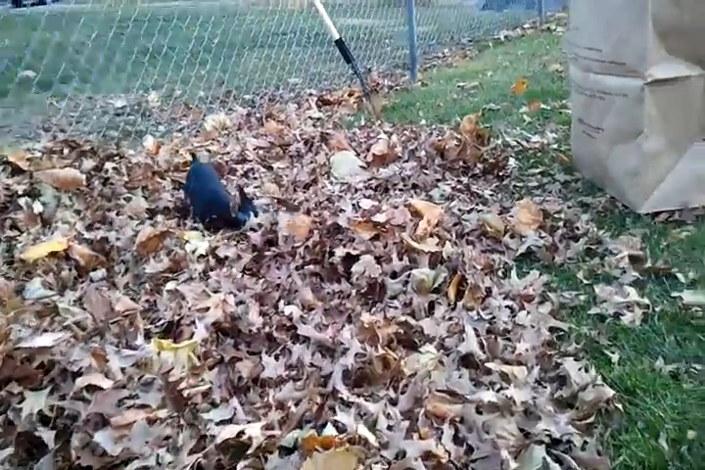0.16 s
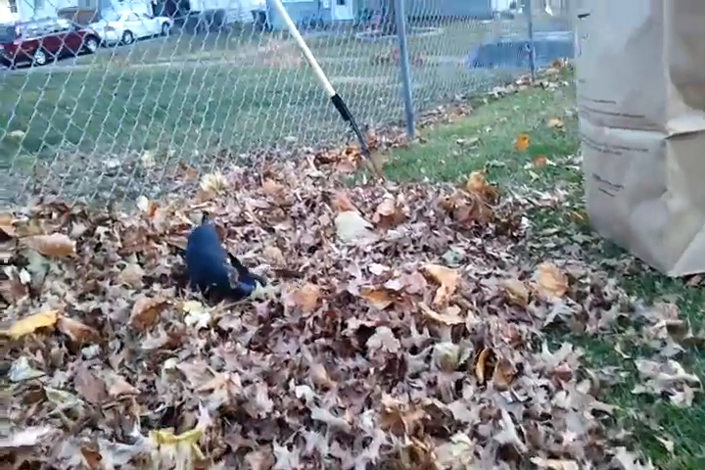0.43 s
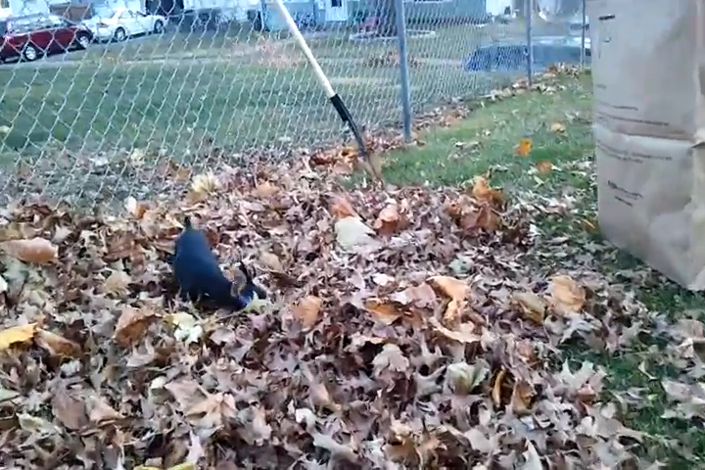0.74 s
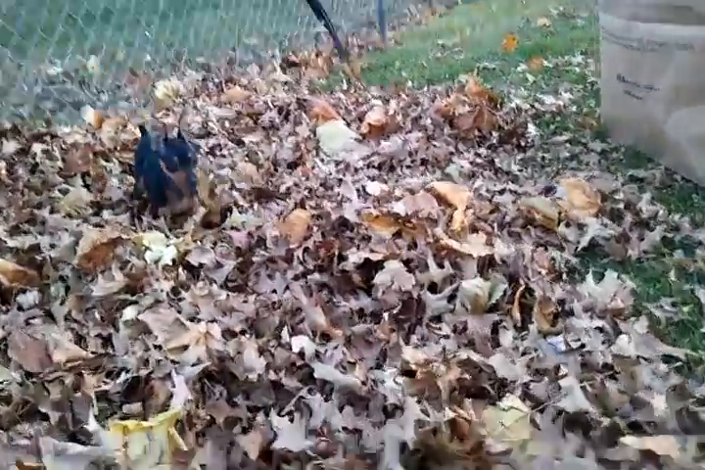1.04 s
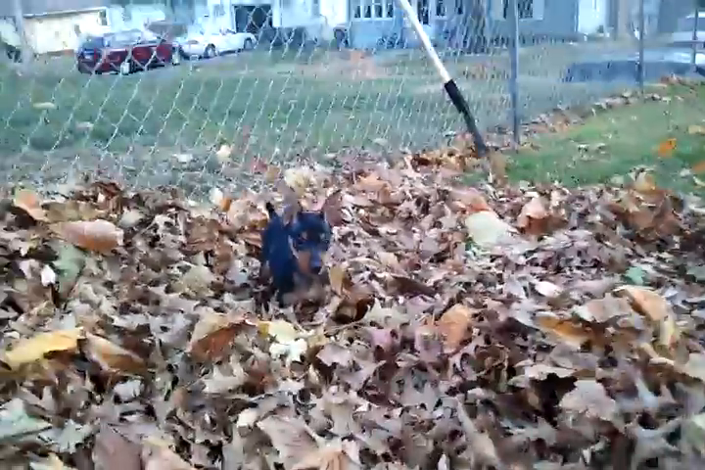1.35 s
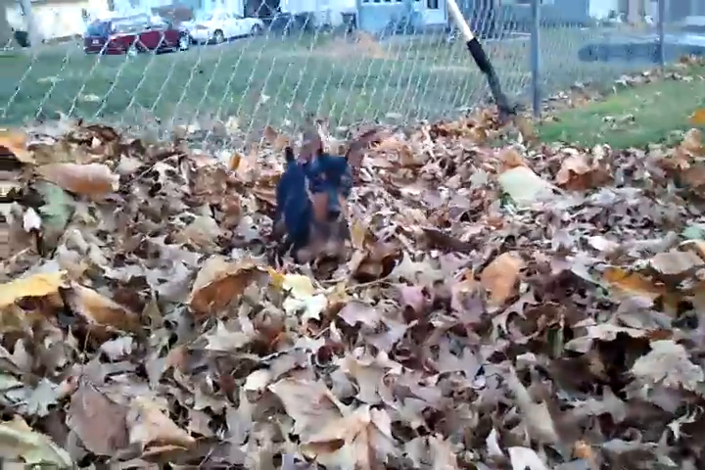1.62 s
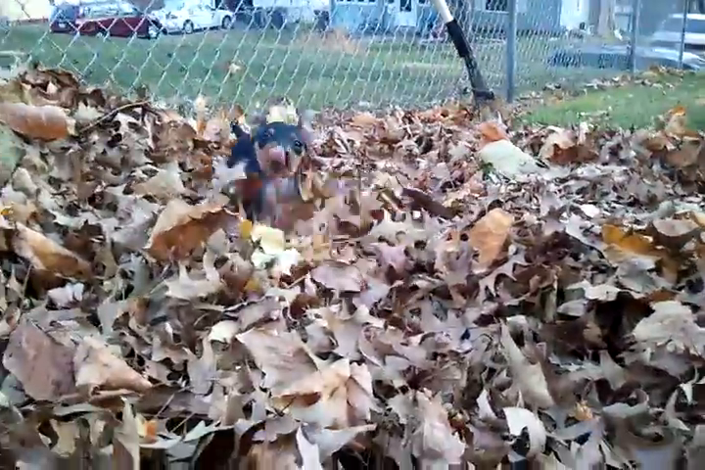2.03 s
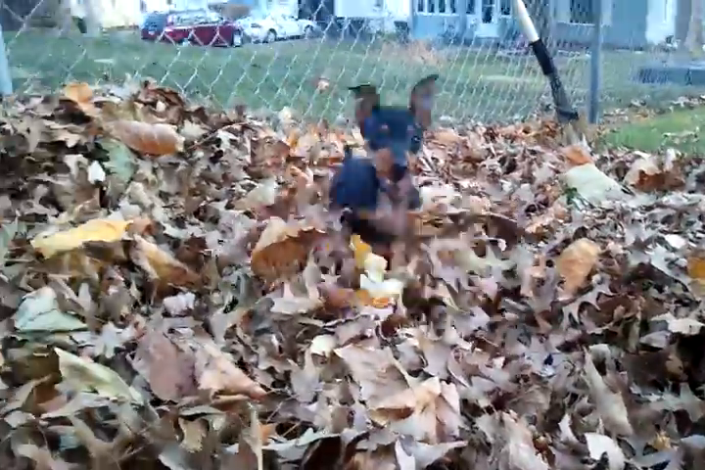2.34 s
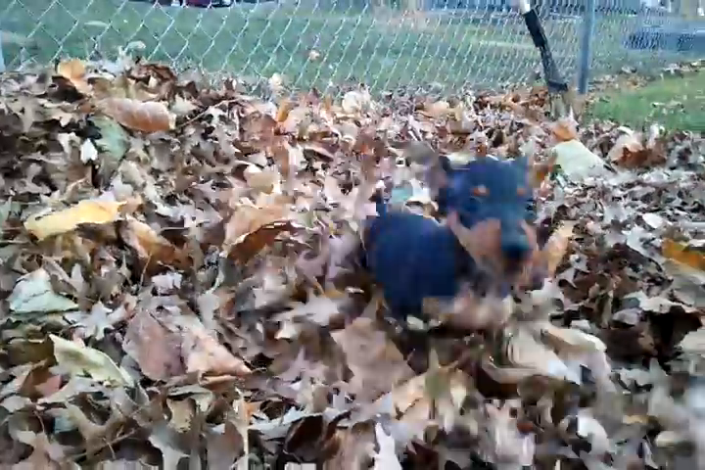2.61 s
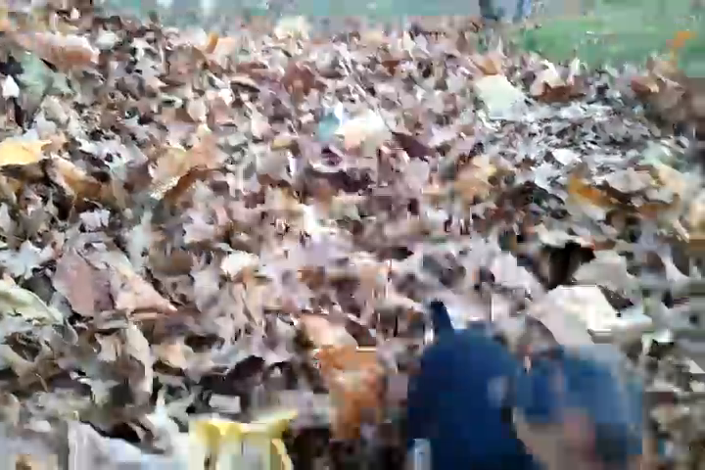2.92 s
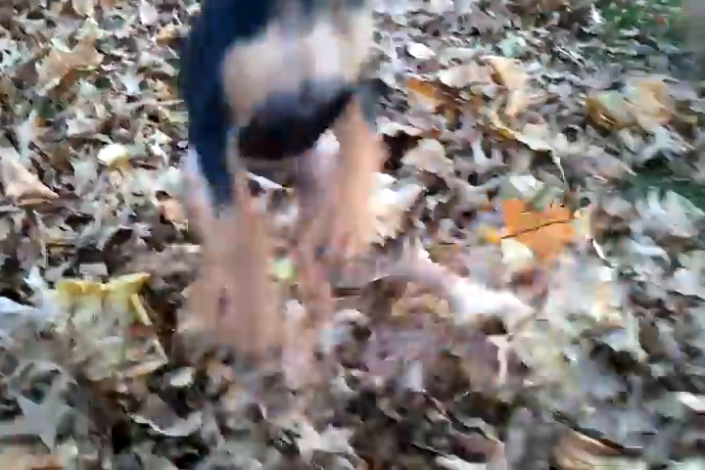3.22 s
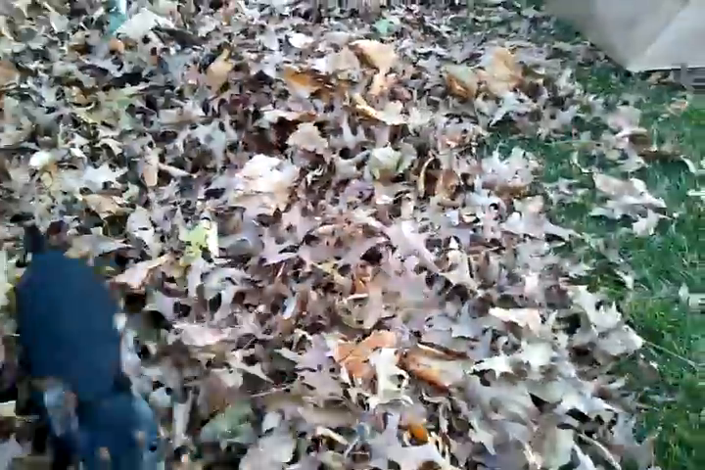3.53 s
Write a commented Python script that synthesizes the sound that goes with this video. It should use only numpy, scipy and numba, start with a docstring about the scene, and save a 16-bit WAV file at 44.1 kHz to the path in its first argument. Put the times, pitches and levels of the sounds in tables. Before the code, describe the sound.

Dry leaves rustle as a small dog moves through a pile: faint at first, with scattered snaps, then a short crunchy surge, crackling, and loud rushes close to a dull, narrow-band outdoor microphone.

```python
"""Dog in dry leaves

A small dog wades and then bounds through a pile of dry leaves in a yard. Sliding leaves hiss (filtered noise
in brief bursts), crinkle (dense tiny ringing cracks) and snap singly (noise bursts exciting a resonance).
A few soft low bumps, perhaps paws, are damped resonances; far traffic and air are shaped noise below.
The narrow-band recorder has a voltage offset, and its limiter ducks everything in the loud bursts."""
import sys
import numpy as np
from scipy import signal
from scipy.fft import rfft, irfft, next_fast_len
from scipy.io import wavfile
from scipy.ndimage import uniform_filter1d
from numba import njit

SR = 44100
rng = np.random.default_rng(int(sys.argv[2]) if len(sys.argv) > 2 else 0)


def transcribe(u):
    """Save the signal u as a 16-bit wav file named by the first command-line argument.

    u: samples, shape (n,) or (channels, n), limited to [-1, 1]; the rate is SR.
    q: integer samples, one column per channel.
    """
    v = np.clip(np.atleast_2d(u).T, -1, 1)
    q = np.round(v * 32767).astype(np.int16)
    wavfile.write(sys.argv[1], SR, q)


def volts_from_db(level):
    """Convert decibel levels to linear amplitude ratios."""
    exponent = np.asarray(level, float) / 20
    return 10 ** exponent


N = 161406  # length [samples]

DENSITY_FOLLOWS = 0.9  # dB of event density per dB of stirring
CLUMP_DB = 3.5  # rms wander of the event density
LOW_TONE_FOLLOWS, LOW_TONE_HZ = -0.13, 1260  # dB of the lower leaf tones per dB of stirring; corner


def rms_one(x):
    """Normalization: scale to unit root-mean-square."""
    return x / np.sqrt(np.mean(x ** 2) + 1e-20)


def at_hz(points, hz):
    """Spectral envelope: interpolate the level in dB along log frequency."""
    table = np.array(points)
    return np.interp(np.log(hz), np.log(table[:, 0]), table[:, 1])


def drift(hz):
    """Low-pass random process: noise through a double real pole, scaled to rms 1."""
    r = np.exp(-2 * np.pi * hz / SR)
    noise = rng.standard_normal(N + SR)
    return rms_one(signal.lfilter([1], [1, -2 * r, r * r], noise)[SR:])  # settled part only


def ring(clicks, hz, t60):
    """Damped resonator: a unit click starts a decaying sine of initial height 1."""
    r = volts_from_db(-60 / (t60 * SR))
    w = 2 * np.pi * hz / SR
    return signal.lfilter([0, np.sin(w)], [1, -2 * r * np.cos(w), r * r], clicks + 1e-18)


def low_tilt(low_db, hz):
    """Spectral shelf: the whole of low_db far below the corner, fading out above it."""
    return low_db / (1 + (hz / LOW_TONE_HZ) ** 2)


def bands(spectrum, patchy_db, low_db):
    """Subtractive synthesis: third-octave noise bands, each with its own level flicker."""
    out, white = 0, rng.standard_normal((2, N))
    edges = 20 * 2 ** np.arange(0, 9.1, 1 / 3)
    for k, (low, high) in enumerate(zip(edges, edges[1:])):
        hz = np.sqrt(low * high)
        # neighbouring bands draw on different noises
        band = signal.sosfilt(signal.butter(2, [low, high], "band", fs=SR, output="sos"), white[k % 2])
        level_db = at_hz(spectrum, hz) + patchy_db * drift(7.7) + low_tilt(low_db, hz)
        out = out + band * volts_from_db(level_db)
    return rms_one(out)


# Stirring of the pile, the gain that drives the rustle: (time [s], level [dB])
STIRRING = [(0.0, -30.5), (0.019, -30.5), (0.158, -42), (0.214, -33), (0.229, -41.5), (0.247, -34),
            (0.263, -30), (0.282, -34), (0.295, -21.5), (0.307, -33), (0.348, -34.5), (0.383, -37.5),
            (0.474, -39), (0.592, -42.5), (0.654, -35.5), (0.728, -44), (0.823, -42.5), (0.854, -40),
            (0.89, -37.5), (1.094, -35), (1.105, -30), (1.197, -31), (1.241, -25), (1.275, -25),
            (1.293, -25.5), (1.303, -18.5), (1.323, -15.5), (1.375, -11.5), (1.417, -9.5), (1.437, -16),
            (1.447, -21), (1.456, -25.5), (1.499, -22.5), (1.521, -28.5), (1.542, -26), (1.562, -35),
            (1.608, -28.5), (1.628, -32.5), (1.691, -32), (1.698, -30.5), (1.706, -32), (1.75, -33),
            (1.786, -30), (1.805, -33), (1.854, -36.5), (1.872, -35.5), (1.9, -32.5), (1.93, -36.5),
            (1.959, -27.5), (1.984, -29), (2.061, -21), (2.102, -29.5), (2.115, -22.5), (2.141, -17.5),
            (2.201, -29.5), (2.235, -24.5), (2.261, -26.5), (2.326, -28), (2.359, -24.5), (2.475, -21.5),
            (2.6, -13), (2.724, -16.5), (2.852, -18), (2.931, -8), (2.993, -8), (3.035, -16.5),
            (3.105, -18), (3.167, -17.5), (3.241, -27.5), (3.289, -27), (3.377, -30), (3.397, -20.5),
            (3.481, -11.5), (3.531, -12.5), (3.576, -21), (3.66, -22)]


def stirring():
    """Excitation envelope: the stirring level in dB at every sample."""
    return np.interp(np.arange(N) / SR, *np.transpose(STIRRING))


def event_density(stir_db):
    """Rate modulation: event density relative to that at the mean stirring level."""
    return volts_from_db(DENSITY_FOLLOWS * (stir_db - stir_db.mean()))


def crunches(stir_db):
    """Shot noise: gain of a steady bed plus brief bursts as leaves break, denser with stirring."""
    base_per_s, time_constant_s = 130, 0.0008  # rate before stirring and clumping
    spread_db, bed_db = 3.0, 1  # mean of the random burst levels before the cap; bed against mean burst power
    denser = event_density(stir_db)
    born = rng.random(N) < base_per_s * denser * volts_from_db(CLUMP_DB * drift(40)) / SR
    power = born * volts_from_db(2 * spread_db * np.minimum(rng.exponential(1, N), 3)) / denser
    r = np.exp(-1 / (time_constant_s * SR))
    bursts = signal.lfilter([1], [1, -2 * r, r * r], power + 1e-18)
    return rms_one(np.sqrt(volts_from_db(2 * bed_db) + bursts / bursts.mean()))


# Spectral envelope of sliding and crinkling leaves: (frequency [Hz], relative density [dB per Hz])
LEAF_SPECTRUM = [(150, -48), (250, -8.5), (475, -17), (577, -6.5), (763, -15.5), (841, -7.5), (2430, -7),
                 (6350, -2.5), (7000, -5.5), (9100, -6.5), (15400, -120)]


def slide(stir_db, low_db):
    """Friction noise: broadband hiss of sliding leaves, modulated by the crunches."""
    return crunches(stir_db) * bands(LEAF_SPECTRUM, 1.22, low_db)


def crinkle(stir_db, low_db):
    """Granular excitation: clumped tiny cracks, each ringing a few cycles at one of twenty pitches."""
    base_per_s, clump_hz = 1500, 59.7  # rate before stirring and clumping
    spread_db, cycles = 0.5, 2.5  # mean of the random crack levels before the cap; cycles to fall by 60 dB
    sizes = volts_from_db(spread_db * np.minimum(rng.exponential(1, N), 3.5)) * rng.choice([-1, 1], N)
    denser = event_density(stir_db)
    born = rng.random(N) < base_per_s * denser * volts_from_db(CLUMP_DB * drift(clump_hz)) / SR
    cracks = sizes * born / np.sqrt(denser)  # density alone leaves the power unchanged
    pitches, dealt = np.geomspace(350, 8000, 20), rng.integers(0, 20, N)
    out = 0
    for k, hz in enumerate(pitches):
        gain = volts_from_db(at_hz(LEAF_SPECTRUM, hz) + low_tilt(low_db, hz)) * hz
        out = out + gain * ring(cracks * (dealt == k), hz, cycles / hz)
    return rms_one(out)


# Single leaves snapping:
# (time [s], peak level [dB], ring [Hz], burst rise time [ms], broad crack against the ring [dB])
LEAF_SNAPS = [(0.2169, -19.5, 3600, 0.52, -4), (0.2604, -19, 6570, 0.37, -3),
              (0.2686, -18.5, 3540, 0.47, 8), (0.2887, -2.5, 6500, 0.49, 5), (0.2975, -7.5, 3120, 0.27, 2),
              (0.3433, -22.5, 5730, 0.32, -0.5), (0.5303, -24, 6500, 0.36, -6.5),
              (0.5813, -22, 1850, 0.4, 5), (0.745, -20.5, 1840, 0.35, 6), (0.815, -14, 5560, 0.4, -11),
              (0.8814, -23, 3640, 0.56, -5), (1.1046, -14, 3830, 0.27, 19), (1.2975, -18, 4020, 0.28, 4.5),
              (1.4135, 0.5, 3730, 0.4, -4), (1.477, -9, 6060, 0.19, 0.5), (1.5067, -8.5, 6140, 0.4, -3),
              (1.5323, -14, 5830, 0.24, 2.5), (1.5788, -8, 6100, 0.3, -1.5), (1.6054, -4, 5870, 0.32, -7),
              (1.6147, -20, 5780, 0.4, 3.5), (1.6676, -4.5, 6270, 0.45, 15), (1.6854, -26, 2750, 0.4, -2),
              (1.6957, -11, 4370, 0.54, 5), (1.713, -10.5, 4620, 0.62, 2.5), (1.735, -20, 3500, 0.44, 0),
              (1.7669, -8, 4200, 0.71, -5.5), (1.8203, -17.5, 5420, 0.32, -5), (1.8492, -8, 6100, 0.26, -2),
              (1.888, -17, 5900, 0.5, -1.5), (1.9046, -12, 6100, 0.13, -1.5), (1.9368, -4, 6040, 0.36, 3),
              (1.9495, -24, 5750, 0.34, 6), (1.9567, -14.5, 5770, 0.8, -3), (1.9605, -1.5, 6300, 0.13, -7),
              (1.996, -17, 3700, 0.44, 1.5), (2.036, -12.5, 4970, 0.33, -7), (2.1103, -4, 5840, 0.53, 2),
              (2.3566, -17.5, 4120, 1, 8), (3.2227, -11.5, 3350, 0.56, -3.5), (3.3004, -10, 2010, 1, -19.5)]


def snaps():
    """Impulsive fracture: a short noise burst is heard broadly and through a resonance of its own."""
    out, t = np.zeros(N + SR), np.arange(800) / SR
    crack_band = signal.butter(2, [500, 7500], "band", fs=SR, output="sos")
    for s, db, hz, ms, broad_db in LEAF_SNAPS:
        age = t * 1000 / max(ms, .05)
        burst = rng.standard_normal(len(t)) * age * np.exp(-age)
        tone = ring(burst, hz, 6.5 / hz)
        broad = signal.sosfilt(crack_band, burst)
        snap = tone / np.abs(tone).max() + volts_from_db(broad_db) * broad / np.abs(broad).max()
        start = int(s * SR)
        out[start:start + len(t)] += volts_from_db(db) * snap / np.abs(snap).max()
    return out[:N]


# Soft low bumps, perhaps paws: (time [s], click level before ringing [dB])
BUMPS = [(0.611, -19.5), (1.299, -15), (1.958, -16.5), (3.588, -24.5)]


def thuds():
    """Damped impact: a click excites a dull low resonance, softened by a low-pass filter."""
    clicks = np.zeros(N)
    for s, db in BUMPS:
        clicks[int(s * SR)] = volts_from_db(db)
    bumps = ring(clicks, hz=290, t60=0.02)
    return signal.sosfilt(signal.butter(2, 700, fs=SR, output="sos"), bumps)


# Spectral envelope of far traffic and air: (frequency [Hz], relative density [dB per Hz])
YARD_SPECTRUM = [(12, -31), (20, -2.5), (33, -22.5), (75, -13.5), (129, -21), (191, -25), (205, -29.5),
                 (335, -33.5), (450, -36), (682, -36), (2010, -44.5), (6500, -44), (7000, -41), (9100, -80),
                 (15400, -120)]


def yard():
    """Ambient noise: far traffic and air as a nearly steady low rumble, at rms 1."""
    return bands(YARD_SPECTRUM, patchy_db=0.5, low_db=0)


def scene():
    """Superposition: rustle driven by the stirring, snaps, thuds and the yard."""
    slide_db, crinkle_db, yard_db = 1, -5, -29
    flurry_db, flurry_hz = -0.2, 9.8  # random wander of the rustle's level
    stir_db = stirring()
    low_db = LOW_TONE_FOLLOWS * (stir_db - stir_db.mean())
    rustle = volts_from_db(slide_db) * slide(stir_db, low_db) + volts_from_db(crinkle_db) * crinkle(stir_db, low_db)
    leaves = volts_from_db(stir_db + flurry_db * drift(flurry_hz)) * rustle + snaps() + thuds()
    return (leaves + volts_from_db(yard_db) * yard())[None]


@njit
def follow(x, rise, fall):
    """Envelope detection: first-order smoothing with separate rise and fall rates."""
    out, level = np.empty_like(x), 0.
    for i in range(len(x)):
        level += (rise if x[i] > level else fall) * (x[i] - level)
        out[i] = level
    return out


def limiter_gain(x):
    """Dynamic compression: above the threshold, gain falls by a share of the excess level in dB."""
    threshold_db, share, attack_s, release_s = -16.5, .85, .022, .018
    power = uniform_filter1d(x ** 2, size=441)  # 10 ms mean
    level = np.sqrt(follow(power, 1 / (attack_s * SR), 1 / (release_s * SR)))
    return np.maximum(level / volts_from_db(threshold_db), 1) ** -share


# Converter filter, deepened by a further 60 dB above 10 kHz: (frequency [Hz], gain [dB])
CONVERTER_FILTER = [(6500, 0), (6900, -2), (7150, -5), (7400, -11), (7600, -19), (7680, -27), (7760, -60),
                    (7860, -60), (7950, -27), (8050, -27), (8140, -60), (8260, -60), (8350, -31),
                    (8550, -29), (8800, -32), (9050, -42), (9200, -54), (9300, -90)]


def low_rate(x):
    """Sampling images: band-limit at half the low rate, mirror the spectrum, filter the images faint."""
    sampling_hz = 16000
    size = next_fast_len(N + 4096)
    hz = np.arange(size // 2 + 1) * SR / size
    low = irfft(rfft(x, size) * (hz < sampling_hz / 2), size)
    mirrored = low * (1 + 2 * np.cos(2 * np.pi * sampling_hz * np.arange(size) / SR))
    gain_db = at_hz(CONVERTER_FILTER, hz + 1) - 60 * (hz > sampling_hz / 1.6)
    return irfft(rfft(mirrored) * volts_from_db(gain_db), size)[:N]


def roll_off(x):
    """The treble ends steeply here."""
    return signal.sosfilt(signal.butter(12, 10100, fs=SR, output="sos"), x)


def record(dry):
    """Recorder chain: voltage offset, limiting, soft saturation of peaks, then the low sampling rate."""
    offset, clip_top = -.246, .75  # share of full scale; the offset is ducked with the sound
    x = (dry[0] + offset) * limiter_gain(dry[0])
    x = x / (1 + (x / clip_top) ** 6) ** (1 / 6)
    x = low_rate(x)
    return roll_off(x[None])


dry = scene()
out = record(dry)
transcribe(out)
```